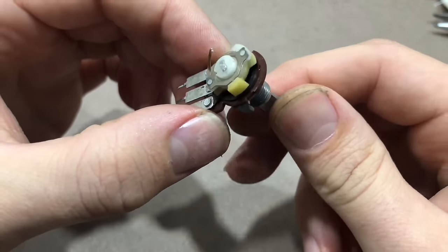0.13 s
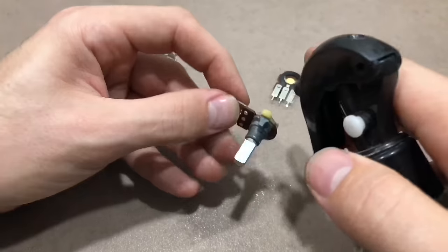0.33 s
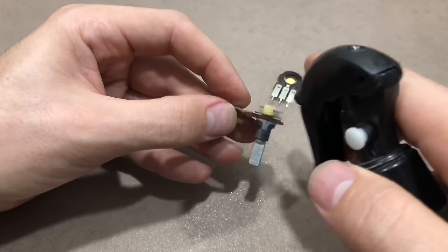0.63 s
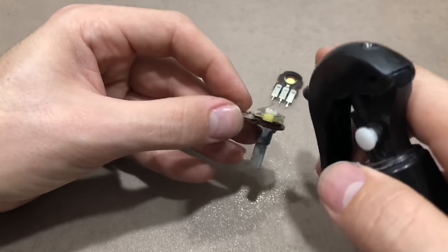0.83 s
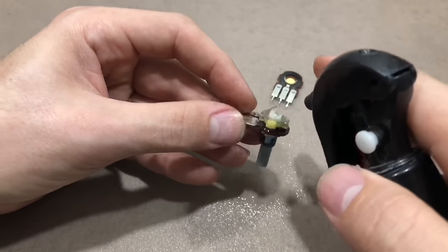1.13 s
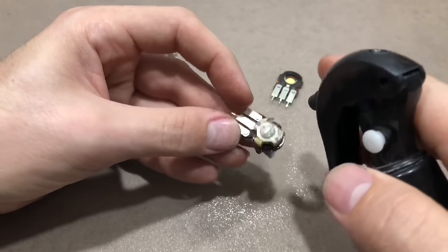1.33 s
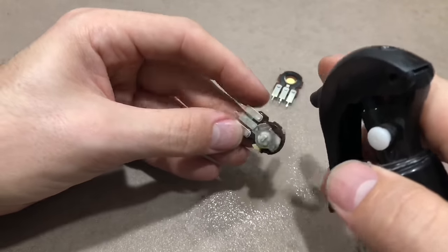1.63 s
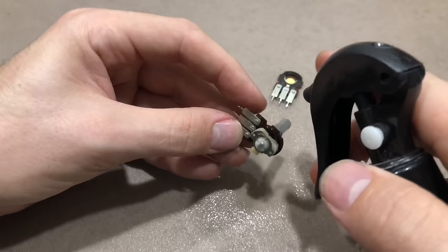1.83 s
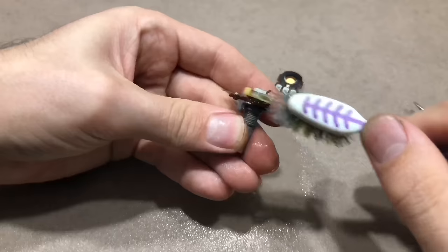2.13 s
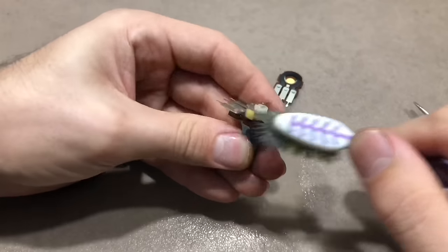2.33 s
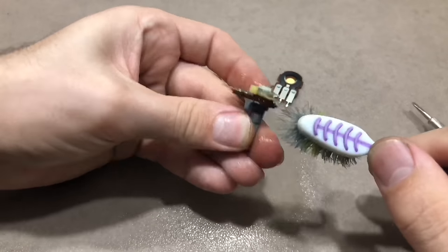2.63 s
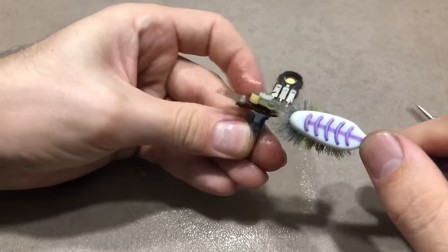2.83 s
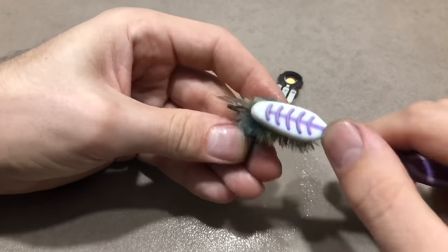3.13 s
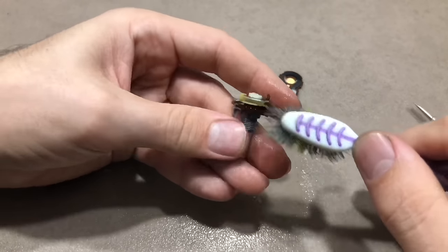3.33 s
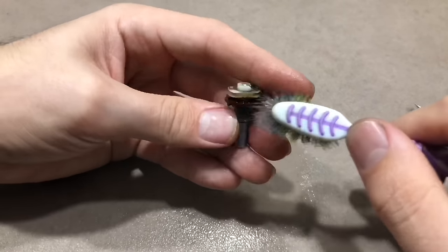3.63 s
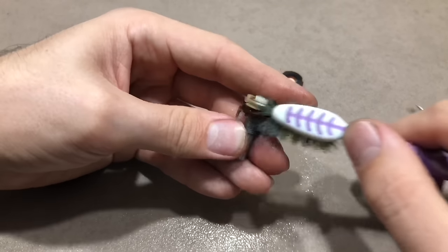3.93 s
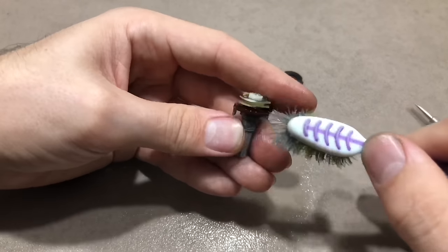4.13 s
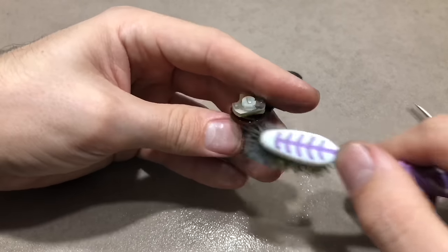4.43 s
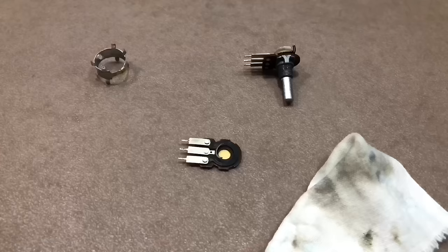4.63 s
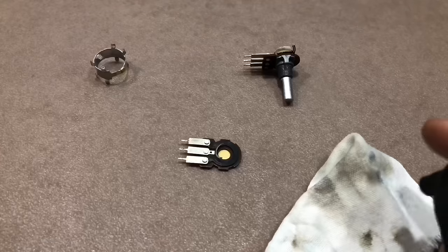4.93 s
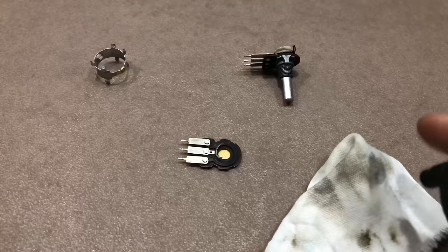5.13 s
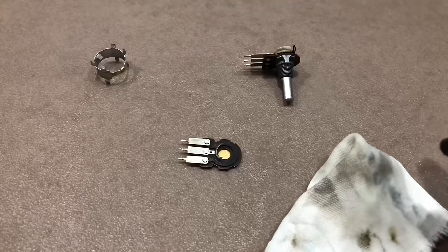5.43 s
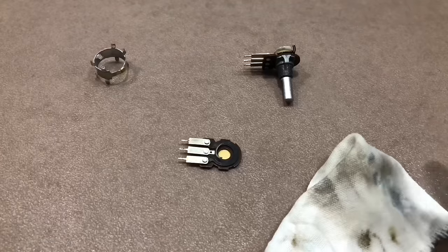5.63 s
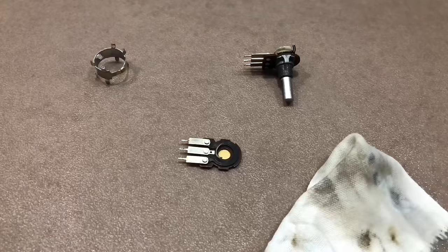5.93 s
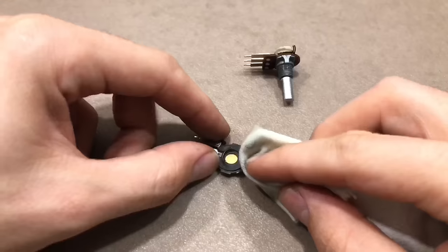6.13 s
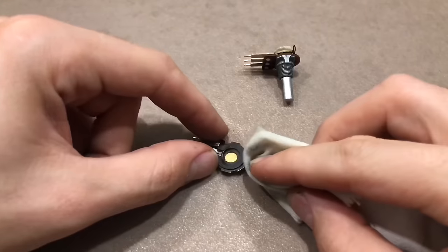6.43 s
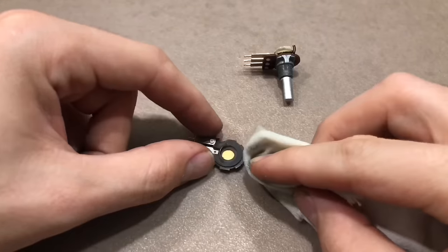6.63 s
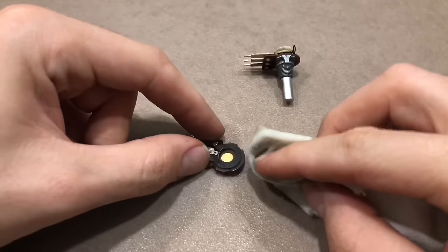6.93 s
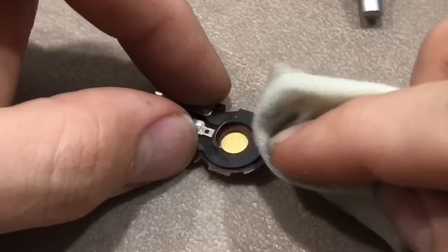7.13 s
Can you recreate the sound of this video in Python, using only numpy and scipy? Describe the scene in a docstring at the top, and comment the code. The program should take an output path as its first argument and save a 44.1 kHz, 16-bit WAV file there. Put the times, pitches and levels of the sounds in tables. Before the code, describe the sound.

A hollow plastic spray bottle clacks and hisses in short bursts, a small brush scratches faintly in fast motion, stronger sprays follow, then near-silent cloth wiping.

```python
"""Bursts of mist, plastic clicks and short intake puffs: a trigger spray bottle at a quiet workbench.
Then a brush scrubs a small part, mostly in fast motion, which lifts the rumble in pitch; more spray, then cloth.
Spray, brush, rattle, cloth and room are shaped noise; the singing bottle, thuds and drone are sines.
Clicks mix a noise crack with decaying sines. Short fades join the shots; one microphone."""
import sys
import numpy as np
from scipy import signal
from scipy.fft import rfft, irfft, next_fast_len
from scipy.io import wavfile
from scipy.ndimage import uniform_filter1d, map_coordinates

SR = 44100
rng = np.random.default_rng(int(sys.argv[2]) if len(sys.argv) > 2 else 0)


def nominal_scale(level):
    """Amplitude ratio for a level in decibels (scalar or array-like)."""
    x = np.asarray(level, float) / 20
    return 10 ** x


def unload_audio(sound):
    """Save the sound as a 16-bit wav file, at the path given as the first command line argument."""
    columns = np.transpose(np.atleast_2d(sound))
    # keep every value between -1 and 1, then stretch to whole-number steps
    steps = np.round(np.clip(columns, -1, 1) * 32767)
    wavfile.write(sys.argv[1], SR, steps.astype(np.int16))


N = 321489

# Shots in order. Each row: start in seconds, playback speed.
SHOTS = [(0, 1), (.233, 1), (1.971, 2), (2.121, 4), (3.95, 2), (4.632, 1), (6.132, 1)]
# Joins that dip briefly. Each entry: time in seconds.
JOINS = [0.236, 1.969, 2.117, 4.631, 6.131]

# Quick squeezes, strongest at once. Each row: start in seconds, length in seconds, hiss level in dB,
# droop by the end in dB, bottle body against the hiss in dB.
SQUEEZES = [(0.322, 0.025, -43, 9, -6.5), (0.648, 0.039, -42, 10, 0), (0.875, .047, -41.5, 6.5, -3.5),
            (1.085, 0.039, -38.5, 11, -3), (1.297, 0.021, -42.5, 14, 0), (1.608, 0.038, -39.5, 16.5, -1),
            (1.872, 0.042, -40, 9.5, -4)]
# Full pulls, swelling first. Each row: start in seconds, length in seconds, hiss level in dB,
# droop by the end in dB, swell from the start in dB, favoured band in Hz.
PULLS = [(5.035, 0.093, -42, 4, 1, 2900), (5.283, .1, -38, 10, 3, 3100), (5.495, 0.092, -39, 7.5, 6, 6400),
         (5.687, 0.093, -36.5, 8.5, 5.5, 6300)]
# Puffs of air as the trigger returns or slams in. Each row: start in seconds, end in seconds, hiss level in dB.
INTAKE = [(0.511, 0.53, -49.5), (0.794, .814, -52), (1.013, 1.023, -49), (1.213, 1.221, -54),
          (1.413, 1.423, -48.5), (1.761, 1.78, -51.5), (1.989, 2, -55), (5.2, 5.226, -49),
          (5.422, 5.441, -49.5), (5.626, 5.639, -52), (5.476, 5.481, -42), (5.673, 5.686, -48)]
# Colour of the mist hiss. Each row: frequency in Hz, relative level in dB per Hz.
JET = [(590, -16), (1000, 0.5), (1160, -6), (2410, -1), (3080, -3), (4020, -2.5), (4570, -0.5),
       (5500, -4.5), (6250, -4), (6940, -7), (13600, -10), (15100, -0.5), (16000, -13.5)]
# Modes of the hollow plastic bottle. Each row: frequency in Hz, relative level in dB, t60 in seconds.
BOTTLE = [(512, 2, 0.026), (707, -4, 0.023), (1210, -6, 0.0094), (2290, -8.5, .02)]
# A new grip raises the bottle's modes. The pair: from when in seconds, pitch factor.
NEW_GRIP = (4.632, 1.101)
# Sprays in which the bottle sings. Each row: spray index (squeezes, then pulls), nominal top pitch in Hz,
# level in dB before the flutter.
SINGING = [(0, 500, -55), (1, 540, -50), (2, 540, -51), (3, 540, -51), (7, 600, -50)]

# Shared click colours. Each: hollow ring in dB, bright pitch in Hz, crack in dB, both levels against the click.
KNOCK_COLOUR = (0, 2430, -11.5)
RETURN_COLOUR = (-16, 3900, -12.5)
FLICK_COLOUR = (-28, 8620, -7.5)
# Trigger meets the piston. Each row: time in seconds, click level in dB.
KNOCKS = [(.5906, -43), (.8124, -33.5), (.851, -35.5), (1.525, -48.5), (1.8334, -37.5)]
# Trigger springs back. Each row: time in seconds, click level in dB.
RETURNS = [(.5131, -33.5), (.7981, -34.5), (1.0162, -35.5), (1.215, -35), (1.4147, -34), (1.7647, -33)]
# Dry thin ticks. Each row: time in seconds, click level in dB.
FLICKS = [(1.9894, -41), (2.642, -53), (2.73, -60), (3.9409, -48), (3.9627, -51), (4.2875, -54),
          (6.575, -58), (6.8319, -29), (7.28, -45.5)]
# Other snaps of valve, trigger and parts. Each row: time in seconds, click level in dB,
# hollow ring against it in dB, bright pitch in Hz, crack against it in dB.
SNAPS = [(0.326, -32, -14.5, 1620, -22), (.3884, -36, -37, 3620, -25), (0.4037, -36.5, -37, 3740, -34),
         (.4513, -35.5, -14.5, 5000, -6.5), (.5295, -25.5, -8.5, 2000, -36), (.7104, -46, -23, 4860, -18),
         (.721, -42, -25, 4200, -25), (0.8794, -26.5, -9, 9600, -13), (1.064, -27.5, -1, 2200, -0.5),
         (1.2674, -33, 2, 2300, -4), (1.226, -47, -8, 2580, -9), (1.6101, -31.5, -1.5, 4630, -10),
         (1.7766, -39.5, 0, 3750, -30), (1.8734, -28.5, -6, 6500, -19), (1.996, -35, -24, 1290, -16.5),
         (4.6816, -44.5, -11, 2750, -27), (5.0322, -39.5, -8, 3090, -17), (5.1956, -26.5, -27, 6700, -22),
         (5.2069, -26.5, -27, 2870, -35), (5.2233, -31.5, -5, 1500, -36), (5.284, -30, -2, 3220, -24),
         (5.2648, -33.5, 2.5, 4700, -16), (5.4148, -30.5, -24, 6840, -17), (5.4313, -25.5, -26, 4530, -33),
         (5.478, -17, -10.5, 6170, -18.5), (5.4934, -24.5, -8, 3260, -26), (5.5126, -25, -30, 9250, -4),
         (5.6188, -37, -25, 6380, -4.5), (5.634, -22, -22, 3570, -40), (5.675, -14.5, -12, 6220, -16),
         (5.8423, -32, -19, 4900, -38), (5.8614, -31.5, -10, 2680, -26), (5.8674, -31.5, -4.5, 2770, -36),
         (5.9678, -33.5, -26, 2340, -11.5), (6.0721, -22, -41, 5250, -25.5), (6.706, -53, -28, 4200, -22),
         (6.893, -36, -25, 1830, -16.5), (6.906, -49, -28, 4100, -20)]
# Single rings of bench, bottle and parts. Each row: time in seconds, level in dB before a slight
# unsteadiness, settled pitch in Hz, t60 in seconds.
THUDS = [(.53, -46, 248, 0.075), (0.532, -46, 145, 0.11), (.813, -45, 266, 0.064), (0.893, -40, 150, 0.27),
         (.893, -43.5, 139, .5), (0.891, -44.5, 250, 0.19), (1.092, -45, 138.6, 0.2),
         (4.646, -55, 246.4, 0.31), (5.283, -28.5, 735, 0.032), (5.68, -49.5, 245, 0.44),
         (5.969, -59, 2410, 0.13), (6.063, -41, 1740, 0.038), (6.705, -61, 1300, .03),
         (6.831, -50, 5240, 0.07), (6.833, -53.5, 1150, .04), (7.278, -47, 1350, 0.019)]

# Brush strokes. Each row: middle in seconds, length in seconds, level of the high bristle noise in dB.
STROKES = [(2.209, .036, -64.5), (2.27, 0.043, -64), (2.334, .037, -62.5), (2.396, 0.039, -64),
           (2.455, .033, -61.5), (2.645, 0.015, -59.5), (2.936, .026, -62.5), (2.998, .032, -60),
           (3.06, 0.024, -56.5), (3.118, 0.037, -59.5), (3.179, .028, -63), (3.426, 0.021, -69),
           (3.794, 0.038, -65), (3.854, 0.029, -63), (3.932, 0.046, -62), (3.963, 0.023, -57),
           (4.067, 0.064, -64), (4.259, 0.061, -66.5), (4.288, .021, -62), (4.41, 0.029, -65.5),
           (4.448, .045, -65), (4.545, 0.026, -62), (4.577, .05, -60.5), (4.733, 0.041, -63.5)]
# Bright bristle colour. Each row: frequency in Hz, relative level in dB per Hz.
BRISTLE_HIGH = [(3000, -40), (6500, -13), (8000, -3.5), (9500, -4.5), (11000, -1.5), (13000, -5),
                (15500, 1.5)]
# Low bristle scrape colour. Each row: frequency in Hz, relative level in dB per Hz.
BRISTLE_LOW = [(1000, 14.5), (2500, 13.5), (4000, 11.5), (6500, 12.5), (9000, -2), (16000, -41)]
# Low scrape against the high bristles. Each entry: playback speed, amplitude ratio.
SCRAPE = {4: 0.69, 2: .28, 1: 0.64}
# Ticks of a brief rattle. Each row: time in seconds, level in dB.
RATTLE = [(4.643, -62), (4.66, -57), (4.672, -57), (4.684, -56.5), (4.697, -62), (4.708, -67)]
# Colour of the rattle. Each row: frequency in Hz, relative level in dB per Hz.
RATTLE_TONE = [(1000, -4), (3000, -23), (4200, -18), (5800, -29), (6300, -11), (7700, -6), (8200, -20),
               (11000, -20), (11600, -32)]
# Rustle of fingers and cloth. Each row: loudest moment in seconds, level in dB, swell in seconds per 60 dB,
# t60 in seconds.
CLOTH = [(5.83, -48.5, 0.013, 0.16), (5.97, -56, 0.4, 0.2), (6.063, -51, 0.025, 0.21),
         (6.33, -70, 0.56, .45), (6.58, -74.5, 0.39, 0.46), (6.71, -68, 0.084, 0.13),
         (6.835, -61.5, 0.046, 0.23), (6.94, -75.5, 0.33, 0.27), (7.29, -67, 0.33, .3)]

# Room noise colour at normal speed. Each row: frequency in Hz, relative level in dB per Hz.
ROOM = [(27, -46), (31, -46), (33, -7.5), (70, -12.5), (250, -15.5), (400, -19.5), (600, -28), (1000, -32),
        (2000, -38), (4000, -41.5), (16000, -48)]
# Narrow humps of the room at normal speed. Each row: centre in Hz, width in Hz, height in dB.
RUMBLE = [(34.97, 0.5, 8.5), (52.16, 3.2, 10.5)]
# Room level in each shot, before it wavers. Each entry: dB.
ROOM_DB = [-63.5, -62.5, -63.5, -64.5, -65, -63, -62]
# Level of the low drone. Each row: time in seconds, level in dB.
DRONE_LEVEL = [(.3, -72), (1.05, -64.5), (1.86, -57), (2.12, -55.5), (2.13, -64.5), (2.4, -62), (2.8, -80),
               (3.15, -67.5), (3.5, -89.5), (3.95, -84)]
# Drone pitch at normal speed in the first four shots, before it wavers. Each entry: Hz.
DRONE_HZ = [48.5, 48.5, 48.5, 35.2]

# Full pulls: they peak this share of the way in, and their finer mist is weaker below PULL_THIN_HZ.
PULL_PEAK, PULL_THIN_HZ = 0.51, 1800
# Body and favoured band against the hiss, then extra body as the valve opens.
PULL_BODY_DB, BAND_DB, KICK_DB, KICK_S = -12.5, -12.5, 21, 0.017
# The valve cuts the jet, then a dribble dies away.
SHUT_S, SHUT_DB, DRIBBLE_S, DRIBBLE_DB = 0.023, 10, 0.041, 12
# Treble against the hiss; it comes late and goes first. The body also drops more than the hiss at the cut.
TREBLE_DB, TREBLE_LATE_DB, TREBLE_LATE_S, TREBLE_SHUT_DB, SHUT_BODY_DB = 2.5, 12, 0.009, 6, 3
# The singing pitch peaks this share into the spray and loses SING_SAG of itself by the end.
SING_PEAK, SING_SAG = 0.35, 0.3


def pump():
    """Liquid and air hiss through the nozzle; the jet shakes the hollow bottle."""
    t = np.arange(N) / SR

    def above(hz):  # crossover to the treble layer
        return 1 / np.sqrt(1 + (8000 / (hz + 1)) ** 8)

    def hollow(hz):
        modes = sum(nominal_scale(db) / np.hypot(1, (hz - c) * t60 * 0.5) for c, db, t60 in BOTTLE)
        return modes * hz / (hz + 300)

    low_grain = patchy(gritty(360, depth_db=2.0), depth_db=4.0)
    low = coloured(low_grain, lambda hz: nominal_scale(along(JET, hz)) * np.sqrt(1 - above(hz) ** 2))
    high_grain = patchy(gritty(610, depth_db=3.0), depth_db=2.5)
    high = coloured(high_grain, lambda hz: nominal_scale(along(JET, hz)) * above(hz))
    body = coloured(gritty(100, depth_db=4.0), hollow)
    layers = np.array([low, body, high])
    out = np.zeros(N)
    for *row, body_db in SQUEEZES:
        out += (layers * jet(*row, body_db=body_db)).sum(axis=0)

    layers[0] = coloured(low, lambda hz: 0.57 + 0.44 / (1 + (PULL_THIN_HZ / (hz + 1)) ** 6))
    for *row, swell_db, centre_hz in PULLS:
        gains = jet(*row, PULL_PEAK, swell_db, KICK_DB, PULL_BODY_DB)
        band = coloured(low, lambda hz: 1 / (1 + ((hz / centre_hz - 1) / 0.13) ** 2))
        out += (layers * gains).sum(axis=0) + nominal_scale(BAND_DB) * gains[0] * band

    for start, end, db in INTAKE:
        # steady until the valve shuts, then a quick fade
        puff = nominal_scale(db - 60 * np.maximum(t - end, 0) / 0.013) * (t > start)
        out += puff * (low + nominal_scale(-35) * high)
    return out


def jet(start, length, db, droop_db, peak=0.023, swell_db=0, kick_db=0, body_db=0):
    """Gains of hiss, body and treble through one spray: swell, droop, cut, dribble."""
    t = np.arange(N) / SR
    end = start + length
    times = [start, start + peak * length, end, end + SHUT_S, end + SHUT_S + DRIBBLE_S]
    drops_db = [swell_db, -swell_db, droop_db, SHUT_DB, DRIBBLE_DB]
    hiss = level(np.transpose([times, db - np.cumsum(drops_db)]))

    def early(span):  # 1 at the start, 0 after span seconds
        return np.clip(1 - (t - start) / span, 0, 1)

    cut = np.clip((t - end) / SHUT_S, 0, 1)
    body = nominal_scale(body_db + kick_db * early(KICK_S) - SHUT_BODY_DB * cut) * (1 - early(0.021))
    treble = nominal_scale(TREBLE_DB - TREBLE_LATE_DB * early(TREBLE_LATE_S) - TREBLE_SHUT_DB * cut)
    return hiss, hiss * body, hiss * treble


def singing():
    """A breathy bottle note: a wavering, fluttering sine whose pitch rises and sags through the spray."""
    t, out = np.arange(N) / SR, np.zeros(N)
    waver, flutter = 0.018 * wobble(80), nominal_scale(2.7 * wobble(70))
    for which, top_hz, db in SINGING:
        start, length = (SQUEEZES + PULLS)[which][:2]
        progress = np.clip((t - start) / (length + SHUT_S), 0, 1)
        sag = SING_SAG * np.abs((progress - SING_PEAK) / (1 - SING_PEAK)) ** 2.5
        phase = 2 * np.pi * np.cumsum(top_hz * (1 - sag + waver)) / SR
        out += nominal_scale(db) * np.sin(np.pi * progress) ** 0.6 * np.sin(phase)
    return out * flutter


def clicks():
    """A crack, a short bright ring and the bottle's hollow modes at new strengths for each click."""
    out, t = np.zeros(N + SR), np.arange(SR // 12) / SR
    events = list(SNAPS)
    for rows, colour in [(KNOCKS, KNOCK_COLOUR), (RETURNS, RETURN_COLOUR), (FLICKS, FLICK_COLOUR)]:
        events += [(*row, *colour) for row in rows]
    bright_rise = 1 - np.exp(-t / 0.000064)
    hollow_rise = (1 - np.exp(-t / 0.00062)) ** 2
    for start, db, hollow_db, bright_hz, crack_db in events:
        luck = 3.8 * rng.standard_normal(len(BOTTLE))  # dB
        noise = np.diff(rng.standard_normal(len(t) + 1))
        grip = NEW_GRIP[1] if start > NEW_GRIP[0] else 1
        grip *= 1 + 0.03 * rng.standard_normal()
        crack = 1.9 * nominal_scale(crack_db - 60 * t / 0.0078) * noise
        bright = np.sin(2 * np.pi * bright_hz * t) * nominal_scale(-60 * t / 0.0044)
        hollow = sum(nominal_scale(mode_db + k - 60 * t / t60) * np.sin(2 * np.pi * hz * grip * t)
                     for (hz, mode_db, t60), k in zip(BOTTLE, luck))
        click = (crack + bright) * bright_rise + nominal_scale(hollow_db) * hollow * hollow_rise
        out[round(start * SR):][:len(t)] += nominal_scale(db) * click
    return out[:N]


def thuds():
    """Soft-edged, slightly unsteady rings whose pitch sags a little after the blow."""
    t = np.arange(N) / SR
    out, unsteady = np.zeros(N), nominal_scale(1.8 * wobble(40))
    for start, db, hz, t60 in THUDS:
        after = np.maximum(t - start, 0)
        cycles = hz * (after + 0.015 * t60 * (1 - np.exp(-after / (0.32 * t60))))
        soft_edge = 1 - np.exp(-after * hz / 0.46)
        out += nominal_scale(db - 60 * after / t60) * np.sin(2 * np.pi * cycles) * soft_edge
    return out * unsteady


def brush():
    """Each stroke swells and fades as the bristles flick across the part."""
    t, out = np.arange(N) / SR, np.zeros(N)
    high_grain = patchy(gritty(600, depth_db=4.0), depth_db=4.5)
    high = coloured(high_grain, lambda hz: nominal_scale(along(BRISTLE_HIGH, hz)))
    low_grain = patchy(gritty(400, depth_db=4.0), depth_db=0.5)
    low = coloured(low_grain, lambda hz: nominal_scale(along(BRISTLE_LOW, hz)))
    for middle, length, db in STROKES:
        speed = [speed for start, speed in SHOTS if start < middle][-1]
        swell = np.exp(-(2.17 * (t - middle) / length) ** 2)
        out += nominal_scale(db) * swell * (high + SCRAPE[speed] * low)
    return out


def rattle():
    """Each tick is a puff of noise that starts at once and dies fast."""
    t = np.arange(N) / SR
    ticks = sum(nominal_scale(db - 60 * np.maximum(t - s, 0) / 0.047) * (t > s) for s, db in RATTLE)
    return ticks * coloured(rng.standard_normal(N), lambda hz: nominal_scale(along(RATTLE_TONE, hz)))


def cloth():
    """Soft, gritty rustle; each move swells and dies."""
    t = np.arange(N) / SR
    tone = [(500, 1.5), (1500, 4.5), (5000, -1.5), (16000, -7.5)]  # (Hz, dB per Hz)
    moves = sum(nominal_scale(db - 60 * np.maximum((s - t) / swell, (t - s) / t60)) for s, db, swell, t60 in CLOTH)
    return moves * coloured(gritty(81, depth_db=3.5), lambda hz: nominal_scale(along(tone, hz)))


def bench(x, t60=0.13):
    """A short diffuse answer from the bench and nearby walls: decaying noise as an echo."""
    t = np.arange(SR // 8) / SR
    tail = rng.standard_normal(len(t)) * nominal_scale(-60 * t / t60) * (t > 0.002)
    return signal.fftconvolve(x, tail / np.linalg.norm(tail))[:N]


def drone():
    """A wavering low tone, raised by each shot's speed."""
    starts, speeds = np.transpose(SHOTS[:len(DRONE_HZ)])
    shot = np.searchsorted(starts, np.arange(N) / SR, "right") - 1
    hz = (speeds * DRONE_HZ)[shot] * (1 + 0.00896 * wobble(5.2))
    return np.sqrt(2) * np.sin(2 * np.pi * np.cumsum(hz) / SR) * level(DRONE_LEVEL)


def room():
    """Wavering room noise; faster playback slides its whole spectrum up by the speed."""
    t, out = np.arange(N) / SR, np.zeros(N)

    def humps(hz):
        return sum(db * np.exp(-((hz - c) / w) ** 2) for c, w, db in RUMBLE)

    ends = [start for start, _ in SHOTS[1:]] + [N / SR]
    for (start, speed), db, end in zip(SHOTS, ROOM_DB, ends):
        noise = coloured(rng.standard_normal(N),
                         lambda hz: nominal_scale(along(ROOM, hz / speed) + humps(hz / speed)))
        out += nominal_scale(db + 2.6 * wobble(4 * speed)) * noise * ((t >= start) & (t < end))
    return out


def gritty(rate, depth_db):
    """White noise whose level flickers fast: droplets, bristle tips, fibres."""
    return rng.standard_normal(N) * nominal_scale(depth_db * wobble(rate))


def patchy(x, depth_db):
    """Narrow bands of x swell and fade on their own."""
    z = signal.stft(x, nperseg=256)[2]
    across_bands = uniform_filter1d(rng.standard_normal(z.shape), size=2, axis=0)
    field = uniform_filter1d(across_bands, size=12, axis=1)
    return signal.istft(z * nominal_scale(depth_db * unit(field)), nperseg=256)[1][:N]


def wobble(rate):
    """A smooth random curve, rate knots a second."""
    return map_coordinates(rng.standard_normal(int(N * rate / SR) + 4), [np.arange(N) * rate / SR])


def level(rows, rise=0.0031):
    """Gain per sample from (s, dB) rows, with a soft start and a short fade after the last row."""
    rows, t = np.asarray(rows), np.arange(N) / SR
    db = np.interp(t, rows[:, 0], rows[:, 1])
    fade_db = -60 * np.maximum(t - rows[-1, 0], 0) / 0.11
    return nominal_scale(db + fade_db) * np.clip((t - rows[0, 0]) / rise, 0, 1)


def coloured(x, gain):
    """x with its spectrum times gain(Hz), at rms 1."""
    m = next_fast_len(N + 8192)
    return unit(irfft(rfft(x, m) * gain(np.fft.rfftfreq(m, 1 / SR)), m)[:N])


def along(points, hz):
    """Values between (Hz, value) points on a log frequency axis."""
    f, v = np.transpose(points)
    return np.interp(np.log(hz + 1), np.log(f + 1), v)


def unit(x):
    """Scaled to rms 1."""
    return x / np.sqrt(np.mean(x ** 2) + 1e-20)


def scene():
    """All sources in one mono mix on two equal channels; the bench answers the near ones."""
    near = pump() + singing() + clicks() + brush() + rattle() + cloth()
    mono = near + nominal_scale(-13.0) * bench(near) + thuds() + room() + drone()
    return np.array([mono, mono])


def band_limit(x):
    """A steep low-pass at the top of the band."""
    return signal.sosfilt(signal.butter(12, 16990, fs=SR, output="sos"), x)


def record(dry):
    """The listed joins fade down and up again; the top of the band drops in a step."""
    t = np.arange(N) / SR
    fade = np.prod([np.clip(np.abs(t - s) / 0.029, 0.06, 1) for s in JOINS], axis=0)
    step_db = np.interp(np.fft.rfftfreq(N, 1 / SR), [15700, 15900, 16600], [0, -24, -34])
    mix = irfft(rfft(dry * fade) * nominal_scale(step_db), N)
    return band_limit(mix)


dry = scene()
out = record(dry)
unload_audio(out)
```